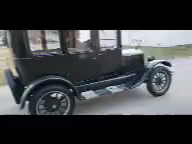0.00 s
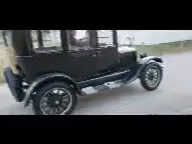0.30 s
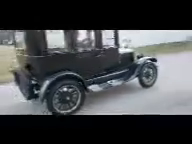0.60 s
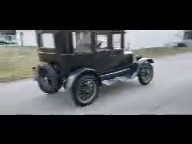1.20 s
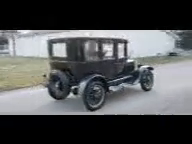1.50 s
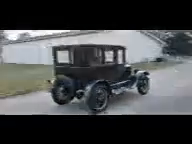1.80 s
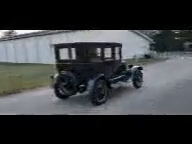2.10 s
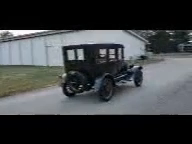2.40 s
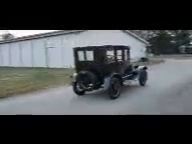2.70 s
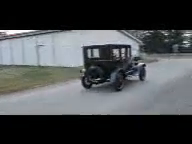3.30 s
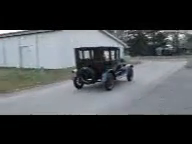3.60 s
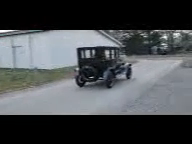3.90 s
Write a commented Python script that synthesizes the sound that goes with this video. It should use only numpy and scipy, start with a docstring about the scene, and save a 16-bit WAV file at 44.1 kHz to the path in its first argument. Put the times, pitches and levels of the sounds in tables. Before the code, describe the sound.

An old car engine chugs and rattles away, backfiring once, stumbling and picking up again.

```python
"""Uneven low-rev chugging of a vintage four-cylinder car moving away down a paved lane.
Each firing thumps the exhaust pipe, lets out a gritty chuff and shakes loose metal;
about every other one is trailed by a weak puff. Among light knocks comes one backfire pop
with a thump and a loud clank; the engine stumbles and picks up, over its whirr and the tyres."""
import sys
import numpy as np
from scipy import signal
from scipy.fft import rfft, irfft, next_fast_len
from scipy.io import wavfile
from scipy.ndimage import uniform_filter1d

SR = 44100
rng = np.random.default_rng(int(sys.argv[2]) if len(sys.argv) > 2 else 0)


def persist_wave(psi):
    """Save psi, clipped to +-1, as 16-bit WAV."""
    counts = np.round(np.clip(psi, -1, 1) * 32767).astype(np.int16)
    wavfile.write(sys.argv[1], SR, np.atleast_2d(counts).T)


N = 176400

# engine firings: start_s, thump_db, chuff_db
FIRINGS = [(0.05, -11, -3), (.1304, 1, 2.5), (0.2179, 0, -0.5), (.313, 3, 1.5), (0.4042, 0, -0.5),
           (0.4966, 1.5, 1), (.590, -1, 1), (.688, 3, 1.5), (0.7846, -0.5, -1.5), (0.8845, 3, 4.5),
           (0.989, -3, -3), (1.0909, 0.5, -0.5), (1.182, -1, 0.5), (1.2692, -0.5, 2.5), (1.349, -1.5, -1),
           (1.4331, 1, 1), (1.5101, -3, 1.5), (1.5916, 2, 3.5), (1.6692, -1.5, 0), (1.7517, -0.5, 3),
           (1.8321, -2.5, 1.5), (1.9147, 0, 3), (1.9981, -3, -0.5), (2.0853, -.5, 2), (2.1717, -4, 0.5),
           (2.2602, -2, 1.5), (2.3486, -5, -1), (2.444, 2, -3), (2.5322, -2, -1.5), (2.66, -11, -31),
           (2.7297, -5.5, -1), (2.832, -22, -38), (2.925, -31, -36), (2.9888, -12.5, -6.5),
           (3.1034, -2.5, 1), (3.199, -5, -3), (3.287, -0.5, -1), (3.3671, -4.5, -4.5), (3.4459, -1, 0),
           (3.5185, -5.5, 0), (3.596, -1.5, -1), (3.6715, -4.5, -3), (3.7532, -4, 0.5), (3.8376, -6, -5),
           (3.9238, -3.5, -0.5)]
# weak puffs and one backfire thump (2.572 s): start_s, level_db
PUFFS = [(0.077, -3), (0.258, -6), (.443, -5), (0.63, -7), (0.821, -5), (1.035, -5), (1.220, -5.5),
         (1.385, -4), (1.544, -5.5), (1.705, -2.5), (1.867, -5), (2.031, -4), (2.207, -6), (2.385, -6),
         (2.572, -2.5), (3.041, -8), (3.235, -7.5), (3.397, -5.5), (3.545, -6), (3.704, -8), (3.868, -7)]


def undb(db):
    """Decibels to gain."""
    return 10 ** (np.asarray(db) / 20)


def unit(x):
    """Scale to rms 1."""
    return x / np.std(x)


def gain_curve(points):
    """Gain per sample from (time_s, level_db) points."""
    return undb(np.interp(np.arange(N) / SR, *np.array(points).T))


def receding(db_per_s=1.5):
    """Fade with distance; unity at mid-scene."""
    return undb(-db_per_s * (np.arange(N) - N / 2) / SR)


def filtered(x, response):
    """Apply a response given as a function of Hz."""
    size = next_fast_len(2 * N)
    freq_hz = np.fft.rfftfreq(size, 1 / SR) + 1e-6
    return irfft(rfft(x, size) * response(freq_hz), size)[:N]


def colour(x, points):
    """Shape by (freq_hz, level_db) points; rms 1."""
    hz, db = np.array(points).T
    return unit(filtered(x, lambda f: undb(np.interp(np.log(f), np.log(hz), db))))


def shelf(x, points, corner_hz):
    """Move the band above the corner along (time_s, level_db) points."""
    upper = filtered(x, lambda f: 1 / (1 + (corner_hz / f) ** 12))
    return x + (gain_curve(points) - 1) * upper


def flicker(x, depth_db):
    """Narrow bands swell and fade at random; rms 1."""
    spectrum = signal.stft(x, nperseg=1024)[2]
    field = uniform_filter1d(rng.standard_normal(spectrum.shape), size=6, axis=0)
    field = unit(uniform_filter1d(field, size=3, axis=1))
    gain = undb(depth_db * np.clip(field, -2, 2))
    return unit(signal.istft(spectrum * gain)[1][:N])


def impulses(times_s, gains):
    """One impulse per event."""
    return np.bincount(np.clip(times_s * SR, 0, N - 1).astype(int), gains, N)


def bursts(times_s, level_db, attack_s, release_s, hold_s=0):
    """One envelope per event, summed in power."""
    t = np.arange(SR // 2) / SR
    shape = np.minimum(t / attack_s, 1) * np.exp(-np.maximum(t - attack_s - hold_s, 0) / release_s)
    power = signal.fftconvolve(impulses(times_s, undb(level_db) ** 2), shape ** 2)[:N]
    return np.sqrt(np.abs(power))


def lane(x, wet_db=-11.5, t60_s=0.29, delay_s=0.011, lowpass_hz=4900):
    """Add short, dull scatter from the road, the car body and a shed wall."""
    t = np.arange(SR) / SR
    tail = rng.standard_normal(SR) * undb(-60 * t / t60_s) * (t > delay_s)
    wet = signal.fftconvolve(x, tail / np.linalg.norm(tail))[:N]
    return x + undb(wet_db) * filtered(wet, lambda f: 1 / (1 + 1j * f / lowpass_hz))


def tyres(level_db=-46):
    """Rolling noise, fading as the car leaves."""
    # tyres and open air: freq_hz, density_db
    spectrum = [(20, -7), (60, 2), (150, -5), (300, -10), (600, -14.5), (850, -18), (1300, -19),
                (2600, -22), (4500, -27.5), (6000, -39), (9300, -42)]
    return undb(level_db) * receding() * colour(rng.standard_normal(N), spectrum)


def engine_whirr(level_db=-43.5):
    """Running noise follows engine effort and sags in the stumble."""
    # fan, chain and valve gear: freq_hz, density_db
    spectrum = [(20, -17.5), (45, -0.5), (90, 4), (180, -5.5), (300, -21), (600, -17), (850, -22.5),
                (1300, -19.5), (2600, -24), (4500, -23.5), (9300, -30.5)]
    # engine effort: time_s, level_db
    effort = [(0, 3.5), (1.2, 2), (2.38, 1.5), (2.52, 1), (2.72, -1), (2.82, -9), (2.96, -11), (3.06, -3),
              (3.25, 3), (4, 2.5)]
    whirr = flicker(colour(rng.standard_normal(N), spectrum), depth_db=2.5)
    return undb(level_db) * gain_curve(effort) * whirr


def body_rumble(gain_db=-41):
    """The body rumbles at each firing, fading with distance."""
    # body under load: freq_hz, density_db
    spectrum = [(25, -17.5), (55, -2), (120, -7), (190, 4), (300, -5), (400, -23), (700, -22),
                (1200, -23.5), (4000, -49)]
    fired_s, thump_db, _ = np.array(FIRINGS).T
    envelope = bursts(fired_s, thump_db + gain_db, attack_s=0.0018, release_s=0.05)
    return envelope * colour(rng.standard_normal(N), spectrum) * receding()


def sheet_metal(times_s, level_db, detune=0.012, scatter_db=2.5):
    """Struck sheet rings; mode mix and tuning vary per blow."""
    # loose sheet modes: freq_hz, level_db, t60_s
    modes = [(1320, -12.5, 0.05), (1570, -1.5, 0.026), (1720, -2, 0.038), (1833, 0, 0.088),
             (2000, -23, 0.055), (2380, -14, 0.028), (2783, -6, 0.063), (2970, -4.5, 0.086),
             (3520, -7, .04), (4160, -9.5, 0.054)]
    mode_hz, mode_db, t60_s = np.array(modes).T[:, :, None]
    t = np.arange(SR // 5) / SR
    out = np.zeros(N + SR)
    for start_s, blow_db in zip(times_s, level_db):
        tuning, mix = rng.standard_normal((2, len(modes), 1))
        decay = undb(blow_db + mode_db + scatter_db * mix - 60 * t / t60_s)
        ring = decay * np.sin(2 * np.pi * mode_hz * (1 + detune * tuning) * t)
        start = int(max(start_s, 0) * SR)
        out[start:start + len(t)] += ring.sum(0)
    return out[:N]


def rattle(gain_db=-44, lag_s=0.012, jitter_s=0.004):
    """Firings and puffs shake loose metal."""
    fired_s, _, chuff_db = np.array(FIRINGS).T
    puffed_s, puff_db = np.array(PUFFS).T
    shaken_s = np.r_[fired_s, puffed_s] + lag_s
    shaken_s += jitter_s * rng.standard_normal(len(shaken_s))
    return sheet_metal(shaken_s, np.r_[chuff_db, puff_db] + gain_db)


def knocks_and_backfire(crack_db=-34, ring_db=-31):
    """Knocks and one backfire pop with a loud clank crack and ring the sheet metal."""
    # knocks, backfire pop (2.563 s) and its clank: start_s, level_db
    events = [(.699, -19), (0.896, -14), (1.531, -5.5), (1.552, -7), (1.6019, -16), (2.094, -17),
              (2.5629, -2), (2.568, 1.5), (3.113, -18)]
    # crack noise: freq_hz, density_db
    spectrum = [(300, -5.5), (700, 1), (1700, -5), (3000, -2.5), (5000, -4), (9300, -10)]
    start_s, level_db = np.array(events).T
    envelope = bursts(start_s, level_db + crack_db, attack_s=0.0015, release_s=0.016)
    crack = envelope * colour(rng.standard_normal(N), spectrum)
    return crack + sheet_metal(start_s, level_db + ring_db)


def gas_hiss(grit_per_s=1700, grit_spread_db=1.5, grit_share=0.43):
    """Turbulent hiss and dense grit, flickering in colour, duller with distance."""
    # escaping gas: freq_hz, density_db
    spectrum = [(150, 4), (300, -0.5), (500, -4.5), (850, -11.5), (1300, -3.5), (1720, 0), (2200, -1),
                (2700, 1), (3200, -0.5), (4000, -4), (4350, -3.5), (4900, -9), (5700, -7.5), (6500, -9),
                (8200, -10), (8900, -11.5)]
    # chuff upper mids and above: time_s, level_db
    bite = [(0, -2.5), (.9, 0.5), (1.6, 0), (2.3, 0), (2.751, -3.5), (3.12, 4.5), (3.25, 4), (4, -0.5)]
    # chuff treble: time_s, level_db
    treble = [(0, 4.5), (.9, 1), (1.3, 0), (2.2, -0.5), (2.7, 0), (3.15, -8), (3.4, -4), (4, -1)]
    grains = rng.random(N) < grit_per_s / SR
    size, noise = rng.standard_normal((2, N))
    grit = grains * np.sign(noise) * undb(grit_spread_db * np.clip(size, -2, 2))
    turbulence = np.sqrt(grit_share) * unit(grit) + np.sqrt(1 - grit_share) * noise
    hiss = flicker(colour(turbulence, spectrum), depth_db=3.5)
    hiss = shelf(hiss, bite, corner_hz=3220)
    return shelf(hiss, treble, corner_hz=4860)


def silencer_shell(x):
    """The thin shell rings with the gas leaving it."""
    # shell resonances: freq_hz, width_hz, boost_db
    modes = [(1708, 63, 3), (2703, 166, 4)]
    return filtered(x, lambda f: 1 + sum((undb(db) - 1) / (1 + 1j * (f * f - hz * hz) / (f * width_hz))
                                         for hz, width_hz, db in modes))


def chuffs(firing_gain_db=-34.5, puff_gain_db=-31, lag_s=0.001, hold_s=0.0068):
    """Each firing and puff vents a burst of gas through the silencer."""
    fired_s, _, chuff_db = np.array(FIRINGS).T
    puffed_s, puff_db = np.array(PUFFS).T
    strong = bursts(fired_s + lag_s, chuff_db + firing_gain_db,
                    attack_s=0.0099, release_s=0.017, hold_s=hold_s)
    puffs = bursts(puffed_s, puff_db + puff_gain_db, attack_s=0.0078, release_s=0.02, hold_s=hold_s)
    return silencer_shell(np.hypot(strong, puffs) * gas_hiss())


def exhaust_pipe(times_s, level_db, push_corner_hz, bass_cut_hz=57.9, bass_cut_damping=0.68):
    """Rounded gas pushes ring the pipe; the bass falls away steeply below bass_cut_hz."""
    # pipe and silencer modes: freq_hz, width_hz, level_db
    modes = [(41.2, 10.5, 4), (78.1, 11.5, -5.5), (119.6, 72, -13), (172, 65, -9.5), (278, 15, -10.5),
             (350, 22, -20.5)]

    def response(f):
        s = 1j * f
        pipe = sum(undb(db) * s * width_hz / (s * s + s * width_hz + hz ** 2)
                   for hz, width_hz, db in modes)
        bass_cut = s * s / (s * s + s * bass_cut_hz * bass_cut_damping + bass_cut_hz ** 2)
        return pipe * bass_cut ** 2 / (1 + s / push_corner_hz) ** 3
    return filtered(impulses(times_s, undb(level_db) * SR / 1000), response)


def thumps(firing_gain_db=-1.5, puff_gain_db=4.5, puff_lag_s=0.001):
    """Firings, softer puffs and the backfire thump the exhaust pipe."""
    # upper resonances as the tailpipe turns towards the listener: time_s, level_db
    upper = [(0, -2.5), (1, -3.5), (1.7, 2.5), (2.5, 1.5), (3.2, 3), (4, 4)]
    fired_s, thump_db, _ = np.array(FIRINGS).T
    puffed_s, puff_db = np.array(PUFFS).T
    strong = exhaust_pipe(fired_s, thump_db + firing_gain_db, push_corner_hz=176)
    puffs = exhaust_pipe(puffed_s + puff_lag_s, puff_db + puff_gain_db, push_corner_hz=73)
    return shelf(strong + puffs, upper, corner_hz=145)


def scene():
    """Mono mix; metal, backfire pop and chuffs scatter in the lane."""
    mix = body_rumble() + lane(rattle() + knocks_and_backfire() + chuffs()) + thumps()
    return (mix + engine_whirr() + tyres())[None]


def record(dry):
    """The sound cuts in, drops out for an instant and lacks top treble."""
    start_s, gap_start_s, gap_end_s, lowpass_hz = 0.058, 0.070, 0.080, 9350
    t = np.arange(N) / SR
    live = (t > start_s) & ~((t > gap_start_s) & (t < gap_end_s))
    lowpass = signal.ellip(10, 0.2, 80, lowpass_hz, fs=SR, output="sos")
    return signal.sosfilt(lowpass, dry * live)


dry = scene()
out = record(dry)
persist_wave(out)
```